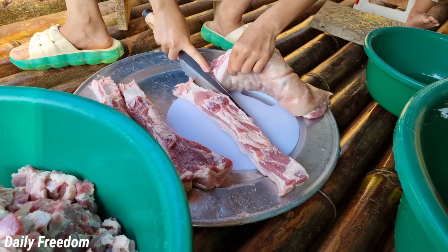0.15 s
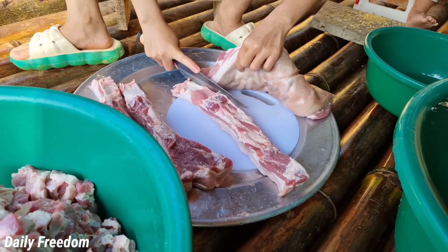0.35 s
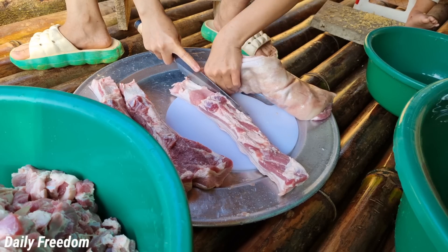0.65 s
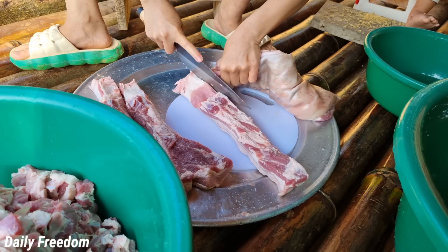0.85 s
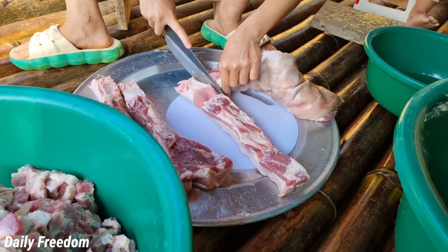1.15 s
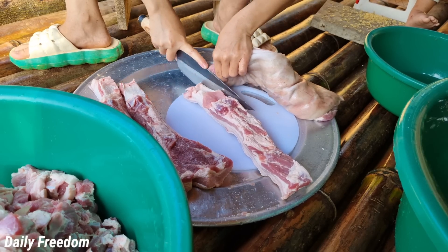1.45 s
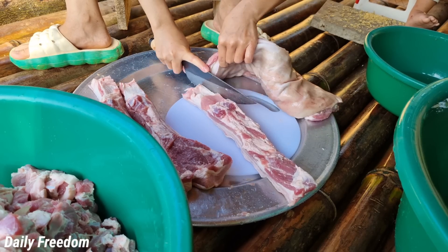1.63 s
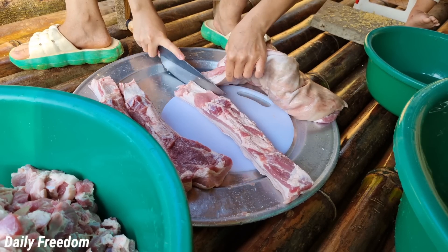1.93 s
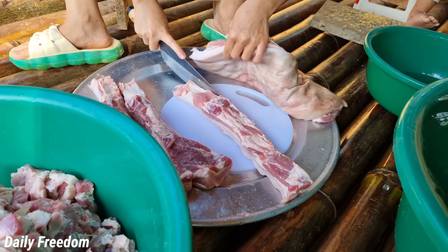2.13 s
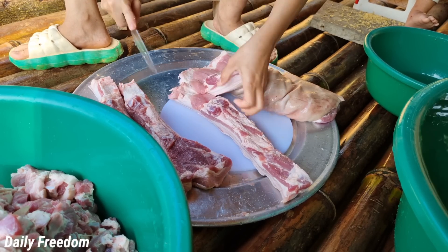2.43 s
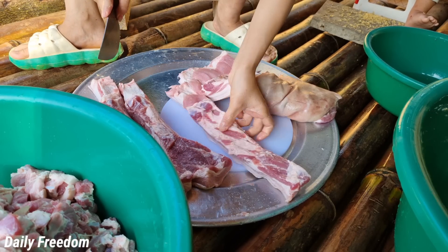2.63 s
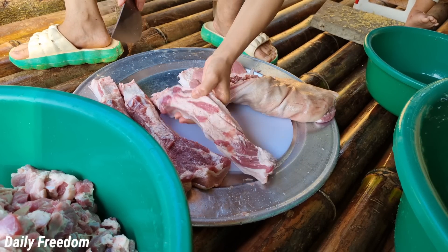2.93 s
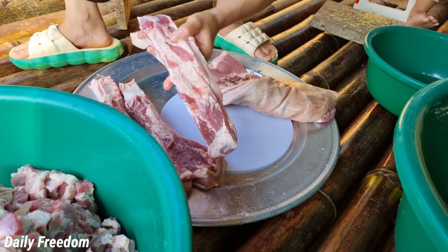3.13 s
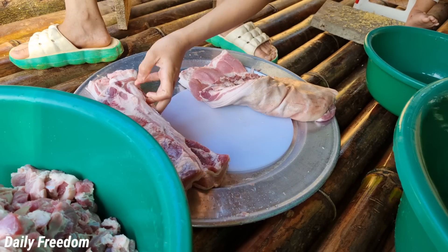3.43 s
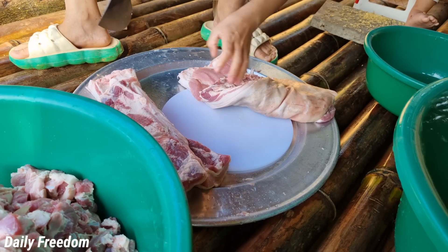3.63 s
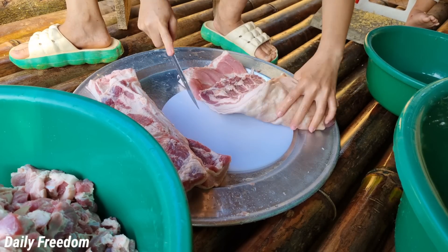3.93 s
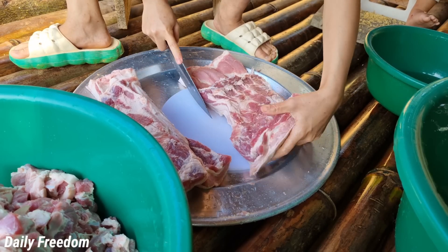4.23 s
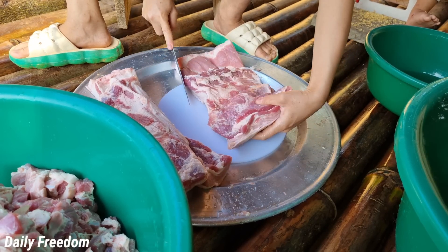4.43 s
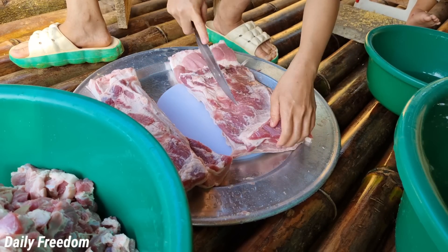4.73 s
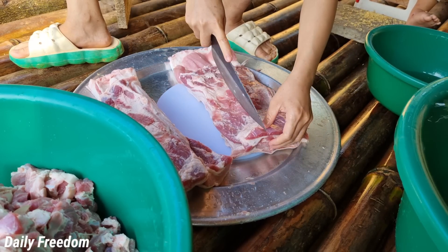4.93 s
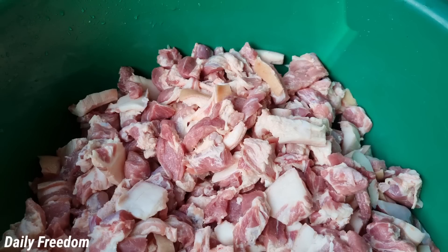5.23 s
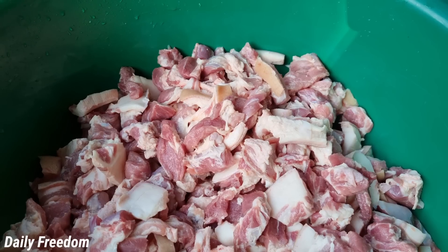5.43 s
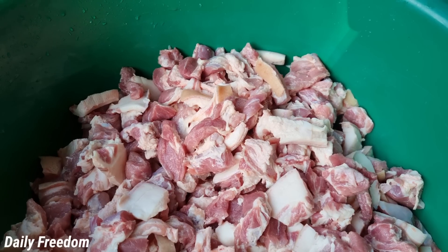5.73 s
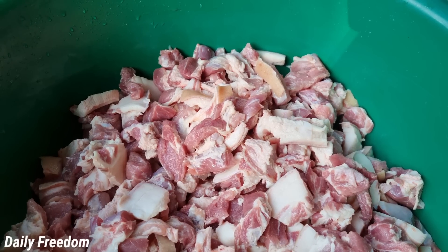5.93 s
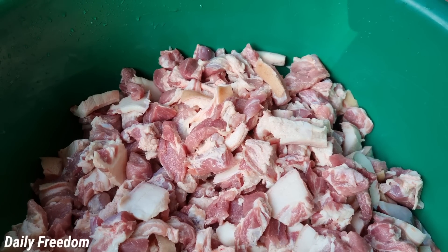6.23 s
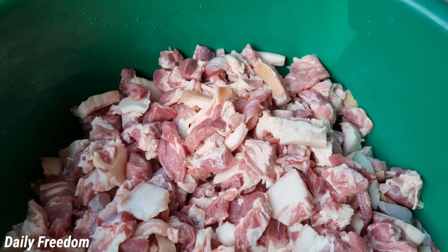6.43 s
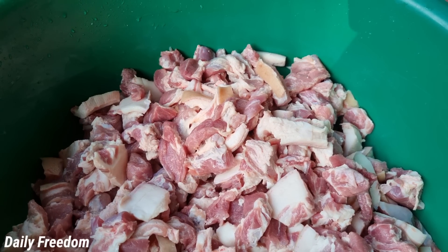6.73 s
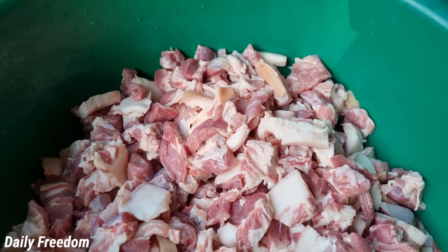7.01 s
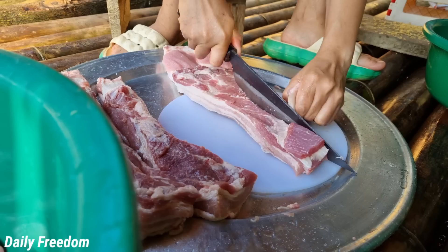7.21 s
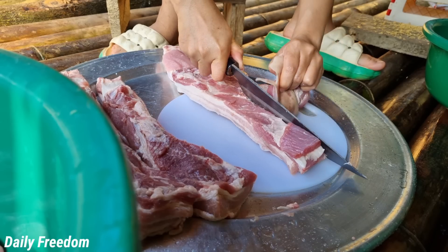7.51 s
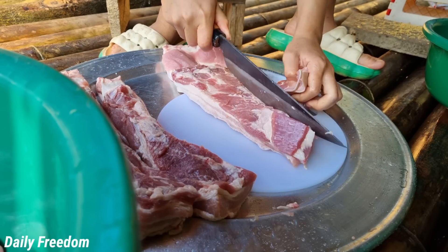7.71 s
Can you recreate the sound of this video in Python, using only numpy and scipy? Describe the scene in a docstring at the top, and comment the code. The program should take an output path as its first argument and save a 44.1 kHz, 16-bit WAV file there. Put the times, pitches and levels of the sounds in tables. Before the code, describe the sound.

Running water bubbles close by; wet meat slides, squelches and thuds on a tray, then drops softly into a plastic basin, a chick peeping afar.

```python
"""Pork cut beside running water

Pork is cut on a metal tray on a bamboo floor, outdoors, while water runs into a tub just to the right.
The stream is filtered noise and swarms of bubbles; blows and slips ring the modes of tray and basin.
Of three passages the middle one has pieces dropping into a plastic basin; the sound fades out between them.
A chick, gliding sine whistles, peeps far off over a low outdoor rumble of noise."""
import sys
import numpy as np
from scipy import signal
from scipy.fft import rfft, irfft, next_fast_len
from scipy.io import wavfile
from scipy.ndimage import uniform_filter1d

SR = 44100
rng = np.random.default_rng(int(sys.argv[2]) if len(sys.argv) > 2 else 0)


def put_to_file(sound):
    """Save the sound as 16-bit audio at rate SR, in the file named by the first command-line argument."""
    columns = np.atleast_2d(sound).T  # one column per channel
    safe = np.clip(columns, -1, 1)
    whole_steps = np.round(safe * 32767)
    wavfile.write(sys.argv[1], SR, whole_steps.astype(np.int16))


N = 347067
T = np.arange(N) / SR

# Passages: tray, basin, tray. Each row: start in seconds, end in seconds.
PASSAGES = [(0, 5.25), (5.25, 7.17), (7.17, 7.87)]
# Colour of the stream, one list per passage. Each row: frequency in Hz, filter gain in dB.
STREAM_SPECTRA = [
    [(200, -52), (450, -8), (750, -7), (1300, -1.5), (2300, -5.5), (3600, -10), (4900, -5.5), (6600, -7.5),
     (8000, -8), (9500, -14.5), (11000, -15.5), (13000, -8.5), (15500, -9)],
    [(200, -48.5), (450, 0), (750, -0.5), (1300, 2), (2800, -4.5), (3700, -6.5), (5200, -6), (6400, -6),
     (8200, -9.5), (10000, -13), (13500, -11), (15500, -12)],
    [(200, -28), (500, -9), (800, -8.5), (1600, -7.5), (3000, -12), (4700, -9.5), (8000, -10.5),
     (10500, -15), (15000, -13)],
]
# Stereo of the stream, one list per passage. Each row: frequency in Hz, left over right in dB.
STREAM_BALANCES = [
    [(1300, -4.5), (2400, -5), (4400, -12), (8000, -9.5), (10000, -0.5)],
    [(400, -0.5), (2400, -8.5), (8000, -4)],
    [(400, -3), (4400, -7.5), (12000, -4)],
]


def stream():
    """Falling water: a haze of spray, ticking droplets and swarms of small bubbles, in bursts."""
    fine = churned(swarm(2700, 8810, per_s=1100, cycles=15, spread_db=4.5), t60=0.055, wet_db=1.5)
    coarse = churned(swarm(466.7, 2776, per_s=450, cycles=11, spread_db=4.5), t60=0.053, wet_db=4.5)
    coarse *= gain_of(2 * drift(16)) * stirred(BUBBLES, settle_s=0.045, depth=0.98)

    drop_sizes = decaying(clicks(per_s=160, spread_db=11.0), decay_s=0.0011)
    droplets = evened(drop_sizes * rng.standard_normal((2, N)))
    haze = colour(rng.standard_normal((2, N)), [(600, -20.5), (2500, -2.5), (8000, -1.5), (10000, -2.5)])
    mist = colour(rng.standard_normal((2, N)), [(7000, -27.0), (10000, -7.0)]) * gain_of(2 * drift(70))
    mist *= evened(1 + decaying(clicks(per_s=35, spread_db=4), decay_s=0.007))

    # each slug of water starts at once and dies away
    bursts = decaying(clicks(per_s=120, spread_db=4.5), decay_s=0.01)
    surge = evened(1 + 0.37 * evened(bursts)) * gain_of(drift(150))
    surge *= stirred(SPATTERS, settle_s=0.023, depth=0.42)
    water = (gain_of(-2.0) * haze + gain_of(-0.5) * fine + gain_of(-18.5) * droplets) * surge
    water += mist + gain_of(-1.6) * coarse * np.sqrt(surge)

    out = np.zeros((2, N))
    for (start, end), spectrum, balance in zip(PASSAGES, STREAM_SPECTRA, STREAM_BALANCES):
        span = slice(round(start * SR), min(round(end * SR), N))
        size = span.stop - span.start
        padded = next_fast_len(size)
        hz = np.fft.rfftfreq(padded, 1 / SR)
        side_db = np.outer([0.5, -0.5], read(balance, hz))
        bins = rfft(water[:, span], padded) * gain_of(read(spectrum, hz) + side_db)
        band_rms = np.std(irfft(bins * (hz > 3000) * (hz < 9000), padded))
        out[:, span] = irfft(bins, padded)[:, :size] / band_rms
    return from_right(out) * gain_of(flow_db())


# Stream level at 3-9 kHz in dB, one per passage.
STREAM_DB = [-38, -49.5, -41.5]
WANDER_RMS_DB, WANDER_PER_S = 0.52, 6


def flow_db():
    """Level of the stream over time: steady within a passage, wandering a little."""
    passage = np.searchsorted([start for start, end in PASSAGES], T, "right") - 1
    return np.array(STREAM_DB)[passage] + WANDER_RMS_DB * drift(WANDER_PER_S)


def swarm(low_hz, high_hz, per_s, cycles, spread_db, count=520):
    """Many bubbles of random size, as strong per Hz as white noise of rms 1."""
    out = np.zeros(N)
    pitches = np.linspace(low_hz, high_hz, count)
    for hz, (a, b) in zip(pitches, rng.standard_normal((count, 2))):
        length = cycles / hz * np.exp(0.55 * a)
        ring = bubble(hz, (0.046 + 0.16 * b) / length, length) / np.sqrt(length)
        births = rng.random((200, 2))
        for at, size in births[:int(per_s * N / SR / count)]:
            add(out, at * N / SR, ring * gain_of(spread_db * min(-np.log(size), 3)))
    return evened(out) * np.sqrt(2 * (high_hz - low_hz) / SR)


def bubble(hz, glide, length):
    """A bubble rings and dies; its pitch glides (octaves per s) as it sinks or rises."""
    t = np.arange(0, 3 * length, 1 / SR)
    pitch = hz * 2 ** (glide * np.minimum(t, 1.2 * length))
    pitch *= 1 + 0.31 * np.exp(-t * hz / 1.01)  # the neck closes within the first cycles
    envelope = (1 - np.exp(-t * hz / 0.36)) * np.exp(-(t / length) ** 1.8)
    return np.sin(2 * np.pi * np.cumsum(pitch) / SR) * envelope


def stirred(rows, settle_s, depth):
    """The water froths after each big event, then settles: a gain of rms 1."""
    kicks = np.zeros(N)
    for s, *rest in rows:
        add(kicks, s, np.exp(-np.arange(SR // 2) / (settle_s * SR)))
    return evened(1 + depth * np.minimum(kicks, 1))


# Loudest spatters. Each row: start in seconds, relative level in dB, settled pitch in Hz.
SPATTERS = [(0.062, -23.5, 5700), (0.113, -27, 5300), (0.138, -22.5, 5660), (0.3, -23, 5950),
            (0.351, -26, 4920), (0.447, -29, 4770), (0.547, -23.5, 5530), (0.661, -25.5, 5260),
            (0.641, -32, 2430), (0.856, -32.5, 2900), (0.934, -24.5, 4700), (1.09, -29, 5150),
            (1.163, -22.5, 5800), (1.25, -23.5, 3280), (1.426, -23, 4800), (1.59, -22, 5160),
            (1.67, -24, 5130), (1.892, -30.5, 2830), (1.92, -22, 6930), (2.178, -29, 6300),
            (2.229, -29.5, 6900), (2.494, -20.5, 5570), (2.521, -23, 3460), (2.81, -29, 4670),
            (2.904, -22, 4430), (2.954, -30.5, 4520), (3.093, -23.5, 3630), (3.125, -22, 4930),
            (3.188, -25.5, 4400), (3.235, -28.5, 6710), (3.298, -25.5, 2680), (3.351, -25, 4750),
            (3.488, -29.5, 3940), (3.565, -27.5, 4860), (3.737, -21.5, 5300), (3.87, -24.5, 5600),
            (3.961, -22.5, 4720), (4.015, -25.5, 5160), (4.375, -25, 5046), (4.68, -26, 2650),
            (4.75, -26.5, 4020), (4.927, -25, 5400), (4.977, -27, 4650), (5.008, -25, 5980),
            (5.376, -31.5, 2920), (5.564, -34.5, 2930), (5.681, -33, 3760), (5.801, -35.5, 2620),
            (5.845, -35.5, 1990), (6.092, -31.5, 5260), (6.167, -36, 2780), (6.357, -34.5, 2750),
            (6.435, -35, 6600), (6.649, -36, 2580), (6.74, -33, 2760), (6.783, -34, 2290),
            (7.056, -39, 2650), (7.838, -33.5, 4840)]
# Sharp, high ticks. Each row: start in seconds, relative level in dB, settled pitch in Hz.
TICKS = [(1.651, -20, 7200), (1.728, -14, 7460), (1.841, -24, 5000), (3.066, -21, 6440),
         (3.645, -21.5, 5160), (4.89, -23, 6900), (7.281, -19.5, 4900)]


def spatters():
    """A slug of water hits the surface: a short spit with a small bubble in it. The briefest only tick."""
    t, rings, spits = np.arange(SR // 10) / SR, np.zeros(N), np.zeros((2, N))
    spit_db = -3
    for rows, cycles, spit_s in [(SPATTERS + lesser_spatters(), 20, 0.009), (TICKS, 7, 0.001)]:
        envelope = (1 - np.exp(-3 * t / spit_s)) * np.exp(-t / spit_s)
        for s, db, hz in rows:
            add(rings, s, gain_of(db) * bubble(hz, 0, cycles / hz))
            band = [(hz / 6, -20), (hz / 2, -7), (hz, 0), (1.41 * hz, -5), (1.75 * hz, -18)]
            spit = evened(colour(rng.standard_normal((2, len(t))), band))
            add(spits, s, gain_of(db + spit_db) * spit * envelope)
    heard = gain_of(-2.5) * churned(rings, t60=0.13, wet_db=3.0) + spits
    return from_right(heard) * gain_of([[-4.5], [5.5]])


# spreads are the farthest a spatter strays either way; level is over the stream
SPATTER_PER_S, SPATTER_OVER_DB, SPATTER_SPREAD_DB = 6, 6.5, 3.5
SPATTER_MIDDLE_HZ, SPATTER_SPREAD_OCTAVES = 4675, 0.5


def lesser_spatters():
    """Small spatters at random, as rows (s, dB, pitch Hz)."""
    rows = []
    for s, stream_db, a, b in random_drops(SPATTER_PER_S):
        db = stream_db + SPATTER_OVER_DB + SPATTER_SPREAD_DB * a
        rows.append((s, db, SPATTER_MIDDLE_HZ * 2 ** (SPATTER_SPREAD_OCTAVES * b)))
    return rows


# Biggest bubbles. Each row: start in seconds, relative level in dB, pitch in Hz, relative rise on surfacing.
BUBBLES = [(0.099, -33.5, 896, -0.16), (0.257, -27, 1360, -0.034), (0.358, -36, 2080, .1),
           (0.46, -35, 1150, -0.28), (0.522, -34, 1195, 0.014), (0.543, -36, 407, 0.038),
           (0.582, -37, 1950, 0.02), (0.649, -33, 1200, 0.062), (1.13, -36, 1255, 0.057),
           (1.143, -37.5, 758, 0.33), (1.178, -28.5, 1372, 0.34), (1.226, -36, 1916, -0.088),
           (1.43, -30, 1325, -0.099), (1.445, -33.5, 602, 0.42), (1.835, -35, 1800, 0.035),
           (2.095, -30, 1236, 0.3), (2.231, -38, 425, 0.074), (2.295, -33, 946, -0.17),
           (2.595, -32, 810, 0.073), (2.715, -40, 410, .1), (2.755, -37, 471, 0.36),
           (2.836, -31.5, 1730, 0.063), (2.905, -46.5, 530, .02), (2.997, -40, 770, 0.049),
           (3.05, -35.5, 1000, -0.18), (3.116, -31.5, 680, 0.36), (3.165, -43.5, 518, .03),
           (3.215, -41, 525, -0.0081), (3.222, -32.5, 1360, -0.081), (3.425, -33, 2000, -0.032),
           (3.748, -31.5, 1156, 0.46), (3.803, -38, 441, 0.3), (3.84, -36, 570, 0.7),
           (4.011, -30.5, 1314, 0.081), (4.029, -38, 428, 0.18), (4.105, -27.5, 1096, 0.43),
           (4.21, -31, 605, -0.058), (4.424, -31.5, 572, -0.031), (4.555, -35.5, 950, 0.1),
           (4.635, -35, 1420, 0.15), (4.686, -28.5, 444, -0.021), (4.725, -33, 890, 0.059),
           (4.942, -34, 820, .08), (4.983, -32, 428, 0.04), (5.059, -32.5, 692, -0.039),
           (5.075, -38, 454, 0.29), (5.129, -26.5, 1860, 0.13), (5.409, -36.5, 1434, -0.025),
           (5.536, -34, 2020, .1), (5.826, -40.5, 563, 0.15), (5.838, -35.5, 1325, -0.032),
           (5.877, -34.5, 1110, 0.98), (6.2, -40, 1620, .3), (6.757, -47, 620, -0.13),
           (6.779, -32, 1650, 0.75), (6.799, -34, 852, 0.77), (6.881, -40.5, 1420, 0.044),
           (6.97, -43, 966, 0.012), (7.03, -41.5, 448, -0.0063), (7.494, -34.5, 1550, 0.011),
           (7.547, -31.5, 1340, -0.19), (7.569, -31.5, 940, 0.34), (7.625, -36, 690, 0.0058),
           (7.672, -35.5, 1580, 0.048), (7.693, -38, 674, -0.021), (7.838, -32.5, 1185, 0.12)]
LIFE_CYCLES, DAMPING_POWER = 23, 1.53
SINK_OCTAVES, SINK_SHARE = 0.36, 0.089  # starts sharp, drops over this share of its life
WAVER_SHARE, WAVERS_PER_CYCLE = 0.035, 0.35  # wobble in churning water, share of pitch
SATELLITE_DB, SATELLITE_MAX_DELAY_S, SATELLITE_CYCLES = -5.5, 0.03, 8.7
SATELLITE_OCTAVES = 1.202  # pitch above the big bubble: 0.2 to 1.2 times this


def glugs():
    """Air dragged under, torn off with a few small bubbles: pitch dips, then glides; smaller ones waver most."""
    out = np.zeros(N)
    for s, db, hz, rise in BUBBLES + gurgles():
        life = LIFE_CYCLES / hz
        u = np.arange(0, 3 * life, 1 / SR) / life
        sink = SINK_OCTAVES * np.exp(-u / SINK_SHARE)
        pitch = hz * 2 ** (sink + 1.5 * rise * np.tanh(0.79 * u ** 1.605))
        wobble = np.interp(u * LIFE_CYCLES * WAVERS_PER_CYCLE, np.arange(40), rng.standard_normal(40))
        pitch *= 1 + WAVER_SHARE * min(hz / 1300, 1) * wobble
        level = gain_of(db) * (1 - np.exp(-u / 0.0036)) * np.exp(-u ** DAMPING_POWER)
        add(out, s, level * np.sin(2 * np.pi * np.cumsum(pitch) / SR))
        for late, smaller, glide in rng.random((4, 3)):
            small_hz = hz * 2 ** (SATELLITE_OCTAVES * (smaller + 0.2))
            length = SATELLITE_CYCLES / small_hz
            small = bubble(small_hz, 0.3 * (glide - 0.3) / length, length)
            add(out, s + SATELLITE_MAX_DELAY_S * late ** 2, gain_of(db + SATELLITE_DB) * small)
    heard = scatter(out * gain_of(2 * drift(110) - 1.8), t60=0.09, wet_db=-4.5)
    return from_right(heard) * gain_of([[-2], [4]])


GURGLE_PER_S, GURGLE_OVER_DB, GURGLE_MEAN_RISE = 13, -9.5, 0.3
GURGLE_LOW_HZ, GURGLE_HIGH_HZ = 601, 2290
GURGLE_TILT_DB_PER_OCTAVE = 2.5  # about 1 kHz: small bubbles are louder


def gurgles():
    """Faint bubbles under the stream at random, as rows (s, dB, pitch Hz, relative rise)."""
    rows = []
    for s, stream_db, a, b in random_drops(GURGLE_PER_S):
        hz = GURGLE_LOW_HZ * (GURGLE_HIGH_HZ / GURGLE_LOW_HZ) ** ((1 + a) / 2)
        db = stream_db + GURGLE_OVER_DB + GURGLE_TILT_DB_PER_OCTAVE * np.log2(hz / 1000)
        rows.append((s, db, hz, GURGLE_MEAN_RISE * (1 + b)))
    return rows


# Bursts of fine spray. Each row: start in seconds, relative level in dB.
SPRAYS = [(0.453, -36), (.671, -34), (.731, -38), (1.111, -39), (1.583, -35), (2.521, -32), (3.794, -39),
          (4.048, -40), (5.86, -39.5), (6.662, -43), (6.781, -46), (6.908, -42), (7.414, -39),
          (7.44, -38.5)]
# Colour of the sizzle. Each row: frequency in Hz, filter gain in dB.
SPRAY_SPECTRUM = [(2000, -26), (7000, -2), (10500, -11.5), (13500, -1), (15500, -7)]
SPRAY_DECAY_S = 0.0086


def sprays():
    """Droplets burst into fine spray: a high sizzle starts at once and dies in a few tiny cracks."""
    t, out = np.arange(SR // 16) / SR, np.zeros((2, N))
    for s, db in SPRAYS:
        cracks = evened(uniform_filter1d(rng.exponential(1, len(t)) ** 2, size=30))
        sizzle = evened(colour(cracks * rng.standard_normal((2, len(t))), SPRAY_SPECTRUM))
        add(out, s, gain_of(db + 5.0) * sizzle * np.exp(-t / SPRAY_DECAY_S))
    return from_right(out) * gain_of([[-1.5], [1.5]])


HISS_HZ, HISS_WIDTH_HZ, HISS_DB = 5670, 220, -55.5


def hiss():
    """A steady, narrow hiss from the water in the middle passage: noise through a resonance."""
    b, a = signal.iirpeak(HISS_HZ, HISS_HZ / HISS_WIDTH_HZ, fs=SR)
    band = signal.lfilter(b, a, rng.standard_normal((2, N)))
    start, end = PASSAGES[1]
    return gain_of(HISS_DB) * evened(band) * (T > start) * (T < end)


# Blows on the tray. Each row: start in seconds, relative level in dB, relative hardness in Hz,
# relative level of the floor's dull thump in dB, t60 of that thump in seconds.
KNOCKS = [(.1675, -12, 1700, -19, 0.11), (.722, -28.5, 900, -34, .08), (.731, -34, 700, -25, 0.053),
          (.749, -26, 2500, -28.5, 0.079), (1.492, -26.5, 800, -29, .09), (1.595, -17, 1000, -21.5, 0.1),
          (1.648, -14.5, 1000, -21, 0.079), (1.664, -27, 1200, -33, 0.087),
          (1.893, -27.5, 1400, -37, 0.072), (2.570, -31, 1500, -41, .1), (2.590, -29.5, 1200, -50, .1),
          (3.599, -17.5, 1400, -25.5, .12), (3.607, -22, 1400, -58, .1), (3.629, -34, 900, -31, 0.15),
          (4.238, -20, 1100, -30, 0.29), (4.3288, -8.5, 1700, -29, 0.065), (4.3335, -21.5, 1500, -48, .06),
          (4.586, -26.5, 900, -27.5, 0.11), (4.718, -23, 1300, -36.5, .12),
          (7.2805, -16.5, 3000, -39, 0.14)]
# Modes of the tray with its board. Each row: frequency in Hz, relative level in dB, t60 in seconds.
TRAY = [(162.3, -18, 0.5), (209, -10, 0.059), (244, -3, 0.06), (333, -9.5, 0.089), (465, -1.5, 0.053),
        (520, -2.5, 0.048), (734, -8.5, 0.093), (977, -3.5, 0.052), (1163, -4.5, 0.037), (1466, 1, 0.017),
        (1910, -13, 0.042)]
# Pieces landing in the basin. Each row: start in seconds, relative level in dB, relative hardness in Hz,
# relative level of the basin bottom's dull thump in dB, t60 of that thump in seconds.
DROPS = [(5.617, -30, 910, -68, .1), (6.104, -39.5, 1000, -76, .1), (6.4515, -27.5, 1100, -27.5, .16),
         (6.4545, -23.5, 1200, -48, .1), (6.6245, -35, 1090, -32, .14), (6.628, -29, 1090, -38, .16),
         (6.71, -33.5, 800, -33.5, 0.16), (7.012, -30.5, 950, -33.5, 0.15), (7.034, -37, 700, -45, .12)]
# Modes of the basin. Each row: frequency in Hz, relative level in dB, t60 in seconds.
BASIN = [(171, -2, 0.27), (229, -2.5, 0.12), (277, -6, 0.2), (541, -4.5, 0.09), (581, -5, 0.08),
         (780, -1, 0.031), (940, -25, 0.067), (1270, -17, 0.021)]
THUMP_SPREAD_OCTAVES, THUMP_FLUTTER_RMS_KNOT_DB = 0.1, 3


def blows(rows, modes, thump_hz, slap_db, slap_t60, wet_db):
    """A soft push rings the modes and a low thump; a wet slap adds noise. Softer blows are duller."""
    t, out = np.arange(SR // 2) / SR, np.zeros((2, N))
    slap_band = [(250, -31.0), (700, -1.5), (1400, -7), (2400, -11.5), (6000, -12), (15000, -25.5)]
    for s, db, hard_hz, thump_db, thump_t60 in rows:
        ring = np.zeros((2, len(t)))
        chance = rng.standard_normal((len(modes), 3))
        for k, ((hz, mode_db, t60), (a, b, c)) in enumerate(zip(modes, chance)):
            side_phase = np.array([[1], [-1]]) * c * min(hz / 2500, 0.6)
            mode = np.sin(2 * np.pi * hz * (1 + b / 100) * t + side_phase)
            ring += gain_of(mode_db + a - 60 * t / t60) * mode * (-1) ** (k // 3)
        slap = evened(colour(rng.standard_normal((2, len(t))), slap_band))
        sound = ring / abs(ring).max() + slap * gain_of(slap_db - 60 * t / slap_t60)
        sound = signal.lfilter(*signal.butter(2, min(1.13 * hard_hz, SR / 3), fs=SR), sound)

        # the loose load detunes each thump and makes it flutter as it settles
        pitch = thump_hz * 2 ** (THUMP_SPREAD_OCTAVES * rng.uniform(-1, 1))
        knots = t * pitch / 2
        flutter = np.interp(knots, np.arange(64), rng.standard_normal(64)) * np.minimum(knots, 1)
        level_db = thump_db + THUMP_FLUTTER_RMS_KNOT_DB * flutter - 60 * t / thump_t60
        bent_t = t + 0.0028 * (1 - np.exp(-t / 0.0047))  # starts sharp
        thump = np.sin(2 * np.pi * pitch * bent_t) * gain_of(level_db)
        add(out, s, gain_of(db + 2.0) * sound + thump)
    return out + gain_of(wet_db) * scatter(out.mean(0), t60=0.2, wet_db=2.5)


# Slips heard directly. Each row: frequency in Hz, filter gain in dB.
RUB_SPECTRUM = [(40, 4), (100, 13), (600, 5), (2200, 1), (5000, 0), (15000, -17.5)]
# Slips driving the tray. Each row: frequency in Hz, filter gain in dB.
RUB_PUSH = [(160, 9), (300, 0), (1100, 0.5), (2000, -0.5)]
CLUMP_RMS_DB, CLUMPS_PER_S = 1.3, 60  # the sliding meat catches and lets go
LOAD_OCTAVES, LOAD_CYCLES_PER_S = 0.12, 7  # detuning either way of all modes but the lowest


def rubbing():
    """Wet meat sticks and slips: tiny slips ring the tray, its upper modes shifting under the moving load."""
    unevenness_db = 2.4 * drift(220) + CLUMP_RMS_DB * drift(CLUMPS_PER_S)
    slips = rng.standard_normal((3, N)) * gain_of(unevenness_db) * stroke_effort()
    heard = slips[0] + colour(slips[1:], [(150, -16), (500, -12), (1200, 2.5)])
    push, out = colour(heard, RUB_PUSH), colour(heard, RUB_SPECTRUM)
    t = np.arange(SR // 2) / SR
    for side in (-1, 0, 1):  # three tunings take turns
        tray = np.zeros(len(t))
        for k, (hz, db, t60) in enumerate(TRAY):
            tuned_hz = hz * 2 ** (side * LOAD_OCTAVES * (k > 0))
            tray += gain_of(db - 60 * t / t60) * np.sin(2 * np.pi * tuned_hz * t) * (-1) ** (k // 3)
        share = np.maximum(np.cos(2 * np.pi * (LOAD_CYCLES_PER_S * T + side / 3)), 0)
        out += signal.oaconvolve(push * share, tray[None] / np.linalg.norm(tray), axes=1)[:, :N]
    return out


# Strokes of sliding meat. Each row: start in seconds, length in seconds, relative level in dB.
STROKES = [(0.17, 0.15, -37), (0.726, 0.089, -44.5), (1.384, 0.17, -36), (1.551, 0.047, -36),
           (1.608, 0.061, -39.5), (1.805, 0.2, -44.5), (2.556, 0.077, -45.5), (2.697, 0.09, -55.5),
           (3.848, 0.031, -51.5), (4.156, 0.11, -43.5), (4.32, .15, -43), (4.543, 0.07, -47.5),
           (4.698, 0.095, -41.5), (5.59, 0.17, -57), (7.28, 0.087, -40)]
SWELL_SHARE, RELEASE_S = 0.44, 0.024  # the hand builds up speed over this share, slides, lets go
HANDLING_DB = -69.5  # faint handling, always present


def stroke_effort():
    """How hard the meat is sliding: each stroke swells, holds and dies away."""
    effort = np.full(N, gain_of(HANDLING_DB))
    for s, length, db in STROKES:
        t = np.arange(0, length + 6 * RELEASE_S, 1 / SR)
        swell = np.minimum(t / (SWELL_SHARE * length), 1)
        release = np.exp(-np.maximum(t - length, 0) / RELEASE_S)
        add(effort, s, gain_of(db) * swell * release)
    return effort


# Wet squelches. Each row: start in seconds, relative level in dB, pitch in Hz, length in seconds.
SQUELCHES = [(0.74, -28, 1050, 0.023), (0.786, -24, 1025, 0.028), (1.557, -31, 1500, 0.067),
             (1.789, -35.5, 1990, 0.047), (2.465, -37, 970, 0.033), (2.515, -32.5, 1070, 0.024),
             (2.52, -31.5, 3402, 0.014), (2.566, -33.5, 1640, 0.021), (1.251, -32, 2850, 0.015),
             (3.598, -33, 860, 0.023)]
# Air squeezed from under a landing piece. Each row: start in seconds, relative level in dB, pitch in Hz,
# glide in octaves per second, decay time in seconds.
PLOPS = [(5.622, -33.5, 313, -4, 0.016), (5.657, -38.5, 242, -3, 0.036), (6.858, -27.5, 248, -25, 0.012),
         (6.885, -42.5, 190, 0, 0.025)]


def squelches():
    """Suction lets go under wet meat: a rough rasp in one cavity, or a single low plop."""
    out = np.zeros((2, N))
    for s, db, hz, length in SQUELCHES:
        noise = rng.standard_normal((3, round(length * SR)))
        cavity = [(hz / 3, -24), (0.93 * hz, -7), (hz, 0), (1.1 * hz, -5), (1.94 * hz, -16), (8 * hz, -32)]
        rasp = evened(colour(noise[0] + 0.67 * noise[1:], cavity))
        add(out, s, gain_of(db) * rasp * signal.windows.tukey(noise.shape[1], 0.8))
    for s, db, hz, glide, length in PLOPS:
        add(out, s, gain_of(db) * bubble(hz, glide, length))
    return out


# Peeps. Each row: start in seconds, length in seconds, first Hz, last Hz, relative level in dB.
PEEPS = [(5.866, 0.13, 4340, 2830, -53), (6.246, 0.17, 4380, 2200, -48), (6.63, 0.14, 4370, 2454, -44.5),
         (7.043, 0.14, 4280, 3400, -52), (7.598, 0.15, 3760, 2704, -43)]
HOARSE_RMS_SHARE, HOARSE_PER_S, PEEP_SWELL = 0.023, 500, 0.6  # hoarseness as share of pitch


def chick():
    """Thin, slightly hoarse whistles that swell and fall ever faster, broken up by distance."""
    out, waver = np.zeros(N), drift(HOARSE_PER_S)
    for s, length, first_hz, last_hz, db in PEEPS:
        u = np.linspace(0, 1, round(length * SR))
        hz = first_hz + (last_hz - first_hz) * u ** 1.3
        hz *= 1 + HOARSE_RMS_SHARE * waver[round(s * SR):][:len(u)]
        envelope = (1 + PEEP_SWELL * u) * signal.windows.tukey(len(u), 0.3)
        add(out, s, gain_of(db) * envelope * np.sin(2 * np.pi * np.cumsum(hz) / SR))
    return scatter(out * gain_of(2.6 * drift(110) - 1.2), t60=0.2, wet_db=0)


# Outdoor rumble. Each row: frequency in Hz, filter gain in dB.
AIR = [(25, -11), (50, 2.5), (100, -5.5), (170, -6), (300, -2), (700, -20.5), (2000, -24)]


def air():
    """Faint low outdoor rumble: filtered noise, partly shared by both channels."""
    noise = rng.standard_normal((3, N))
    return gain_of(-61.5) * evened(colour(noise[0] + 0.87 * noise[1:], AIR))


def random_drops(per_s):
    """Rows (s, level of the stream dB, two chances from -1 to 1), strewn loosely over the passages."""
    rows = []
    for (start, end), level_db in zip(PASSAGES, STREAM_DB):
        chance = rng.uniform(-1, 1, (200, 3))
        for s, (late, a, b) in zip(np.arange(start + 0.5 / per_s, end, 1 / per_s), chance):
            rows.append((s + 0.5 * late / per_s, level_db, a, b))
    return rows


def clicks(per_s, spread_db):
    """Sparse clicks of random size."""
    return (rng.random(N) < per_s / SR) * gain_of(spread_db * np.minimum(rng.exponential(1, N), 3))


def decaying(x, decay_s):
    """Each click starts at once and dies away exponentially."""
    return signal.lfilter([1], [1, -np.exp(-1 / (decay_s * SR))], x)


def drift(per_s):
    """Random wander of rms 1, through per_s new values a second."""
    knots = rng.standard_normal(4000)
    return np.interp(T * per_s, np.arange(len(knots)), knots) * np.sqrt(3 / 2)


def churned(x, t60, wet_db):
    """Echoes off moving water: three sets take turns, so that the colour never sits still."""
    turn = 2 * np.pi * (2 * T + drift(2) / 2)
    turns = [np.sqrt(2 / 3) * np.cos(turn + k * np.pi / 3) for k in range(3)]
    return sum(scatter(x * gain, t60, wet_db) for gain in turns)


def scatter(x, t60, wet_db):
    """Dense early echoes from tubs and floor, different in each channel."""
    t = np.arange(0, t60, 1 / SR)
    taps = rng.standard_normal((2, len(t))) * gain_of(-60 * t / t60) * (t > 0.001)
    taps *= gain_of(wet_db) / np.linalg.norm(taps, axis=1, keepdims=True)
    taps[:, 0] = 1  # direct sound
    taps /= np.sqrt(1 + gain_of(wet_db) ** 2)
    return signal.oaconvolve(np.atleast_2d(x), taps, axes=1)[:, :N]


LAG_SAMPLES = 16


def from_right(x):
    """Sound from the right reaches the left channel late."""
    return np.array([np.roll(x[0], LAG_SAMPLES), x[1]])


def gain_of(db):
    """Decibels to gain."""
    return 10 ** (np.asarray(db) / 20)


def evened(x):
    """Scales to rms 1."""
    return x / np.sqrt(np.mean(x ** 2) + 1e-20)


def read(points, hz):
    """Reads a spectrum on a log-frequency axis."""
    f, value = np.transpose(points)
    return np.interp(np.log(hz + 1), np.log(f + 1), value)


def colour(x, points):
    """Filters by a table of (Hz, dB)."""
    size = x.shape[-1]
    return irfft(rfft(x) * gain_of(read(points, np.fft.rfftfreq(size, 1 / SR))), size)


def add(mix, s, sound):
    """Mixes a sound in at time s."""
    part = mix[..., max(round(s * SR), 0):][..., :sound.shape[-1]]
    part += sound[..., :part.shape[-1]]


def scene():
    """Water, work on the tray and basin, and the yard."""
    water = stream() + spatters() + glugs() + sprays() + hiss()
    tray = blows(KNOCKS, TRAY, thump_hz=147.2, slap_db=-11.0, slap_t60=0.1, wet_db=-9.5)
    basin = blows(DROPS, BASIN, thump_hz=84.0, slap_db=-2.5, slap_t60=0.088, wet_db=-8.5)
    return water + tray + basin + rubbing() + squelches() + chick() + air()


# Fades between passages. Each row: time in seconds, linear gain.
FADES = [(5.1, 0.51), (5.165, 0.34), (5.188, 0), (5.318, 0), (5.365, 0.37), (5.8, 0.84), (7.12, 0.73),
         (7.145, 0), (7.215, 0.0029), (7.28, 0.53)]
LOW_CUT_HZ, EDGE_HZ = 55, 15650


def record(dry):
    """The microphone's low cut, fades between passages, then the band limit."""
    thinned = signal.sosfilt(signal.butter(3, LOW_CUT_HZ, "high", fs=SR, output="sos"), dry)
    faded = thinned * np.clip(np.interp(T, *np.transpose(FADES)), 0, 1)
    lowpass = signal.firwin(511, EDGE_HZ, window=("kaiser", 9), fs=SR)
    return signal.oaconvolve(faded, lowpass[None], "same")


dry = scene()
out = record(dry)
put_to_file(out)
```